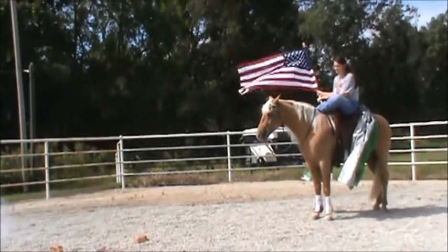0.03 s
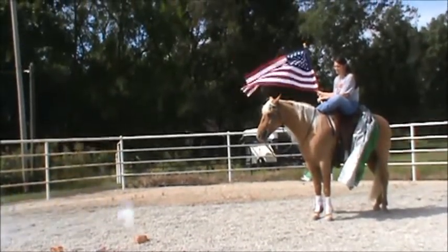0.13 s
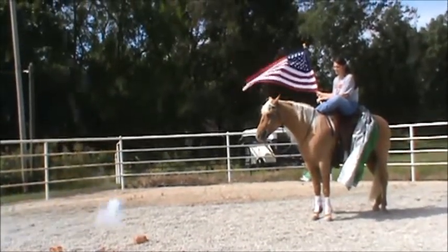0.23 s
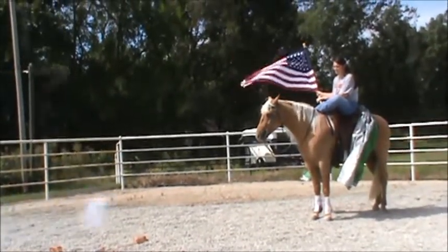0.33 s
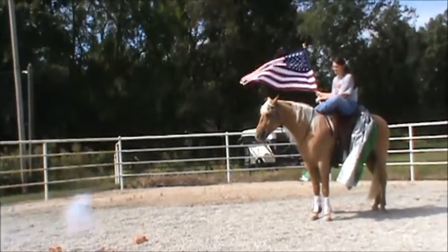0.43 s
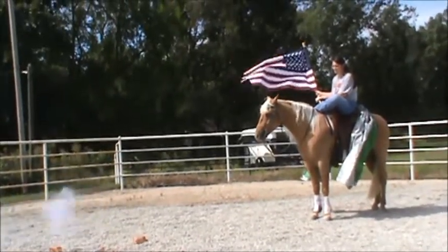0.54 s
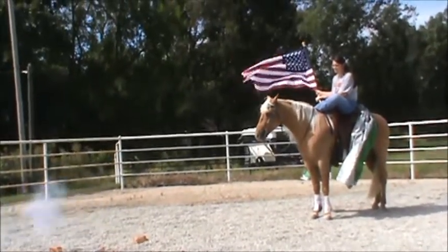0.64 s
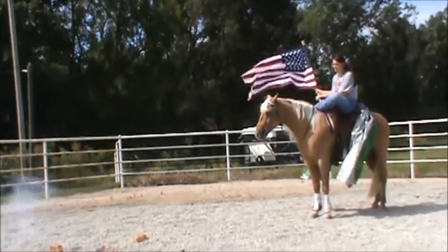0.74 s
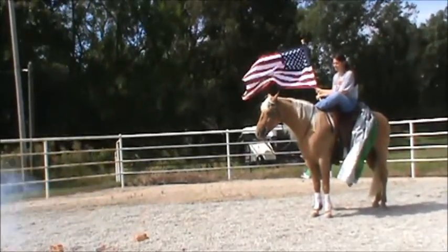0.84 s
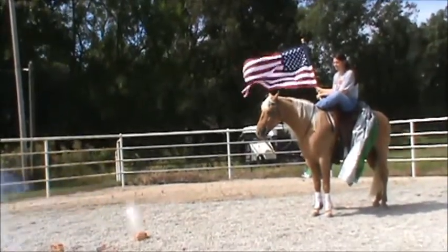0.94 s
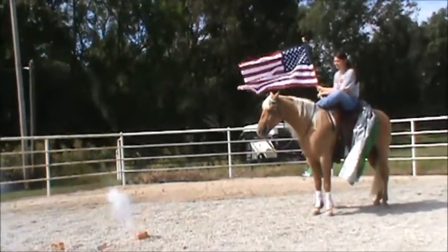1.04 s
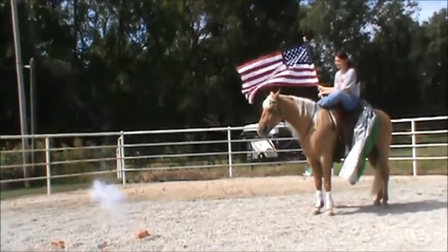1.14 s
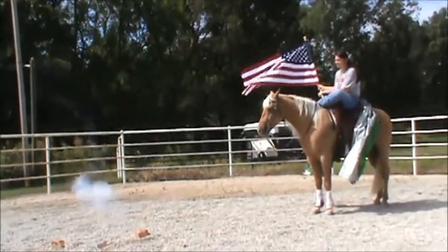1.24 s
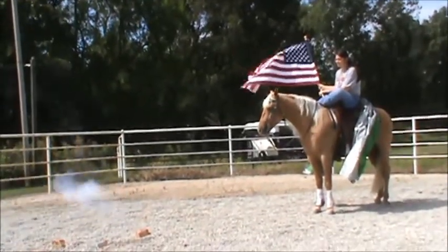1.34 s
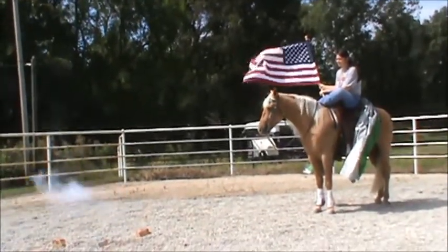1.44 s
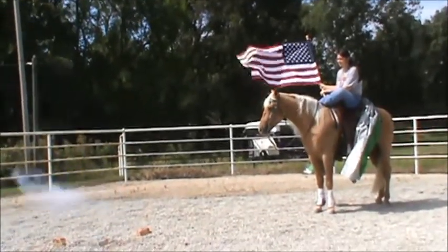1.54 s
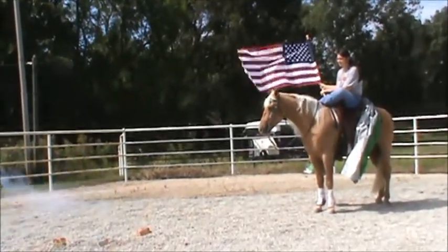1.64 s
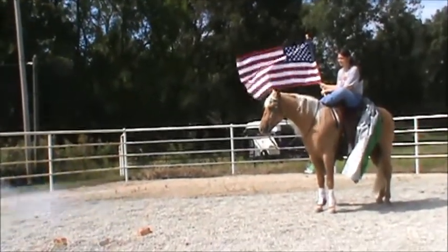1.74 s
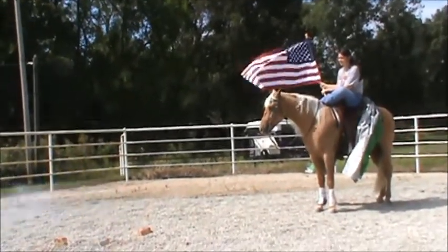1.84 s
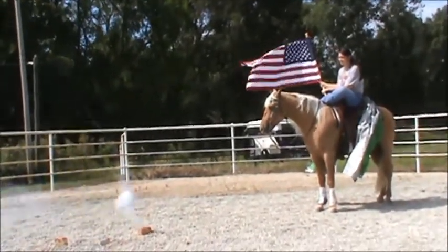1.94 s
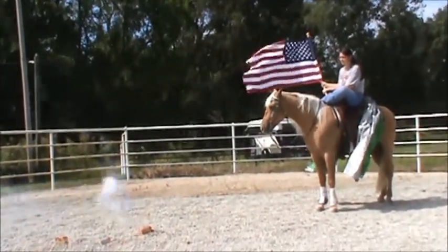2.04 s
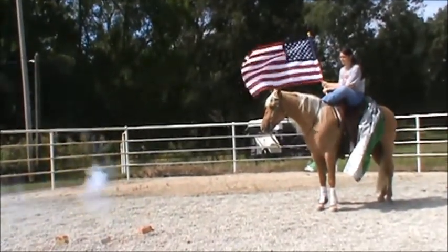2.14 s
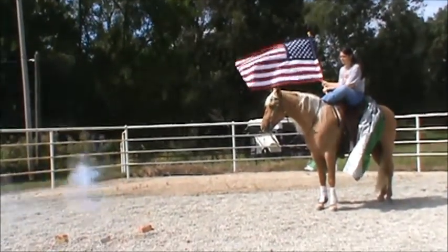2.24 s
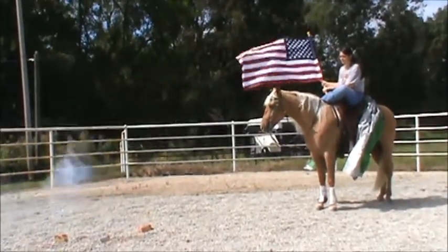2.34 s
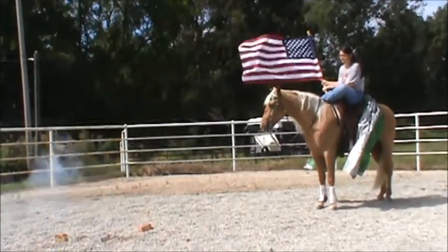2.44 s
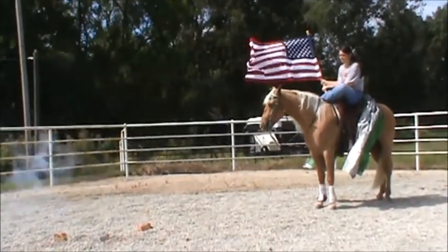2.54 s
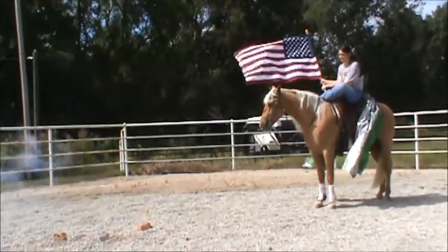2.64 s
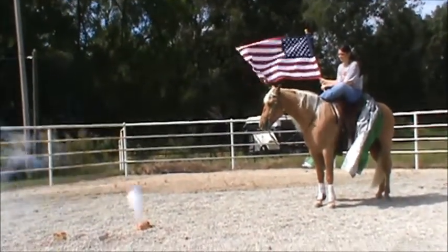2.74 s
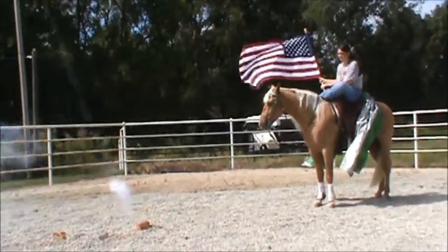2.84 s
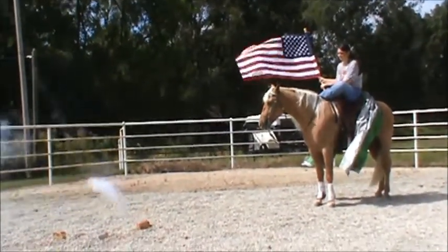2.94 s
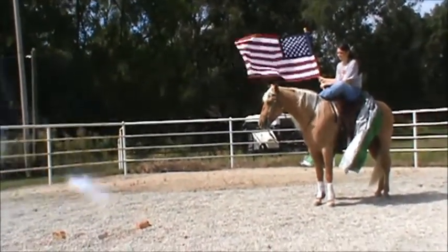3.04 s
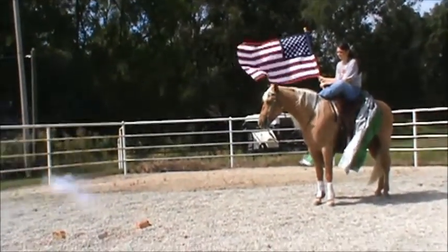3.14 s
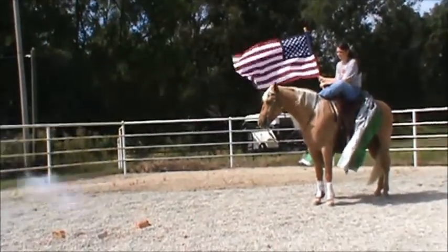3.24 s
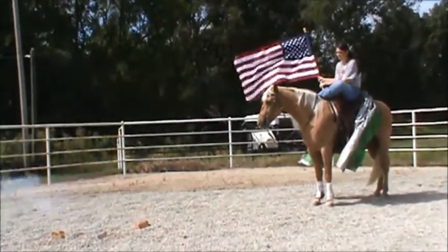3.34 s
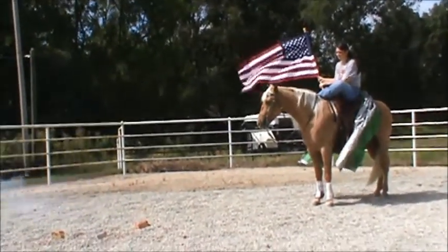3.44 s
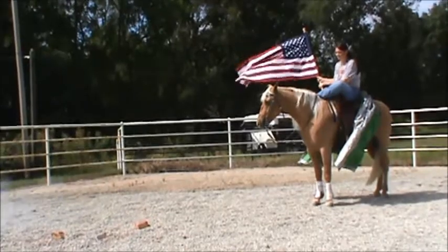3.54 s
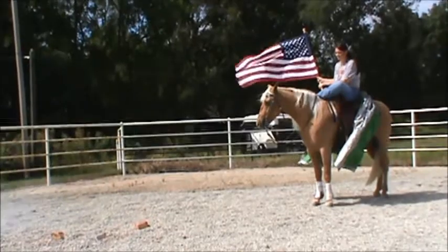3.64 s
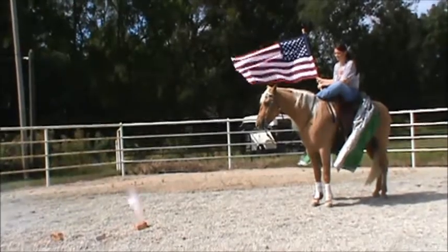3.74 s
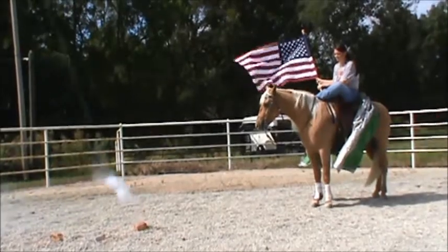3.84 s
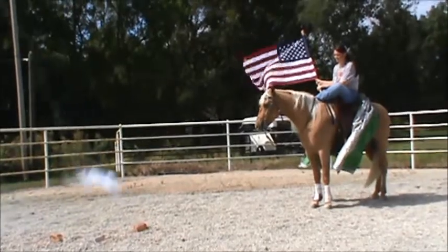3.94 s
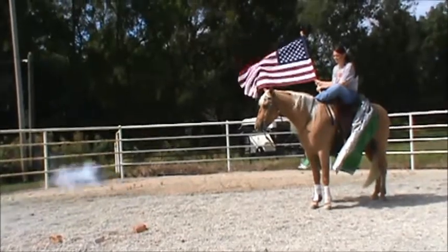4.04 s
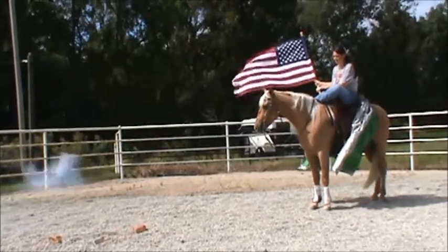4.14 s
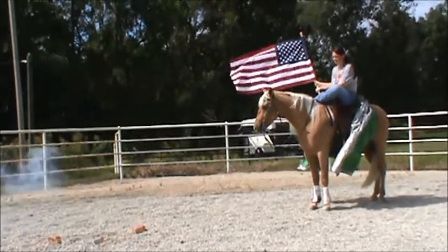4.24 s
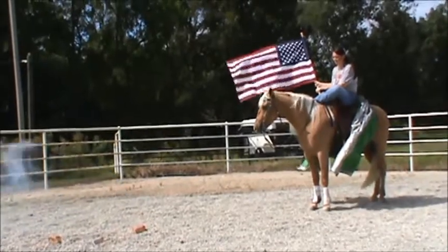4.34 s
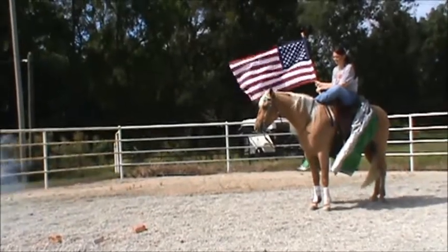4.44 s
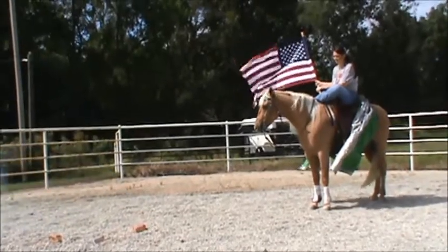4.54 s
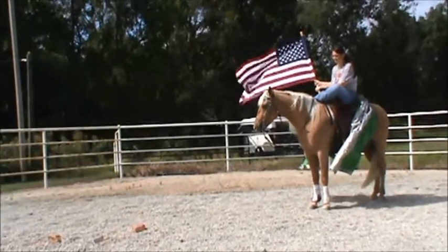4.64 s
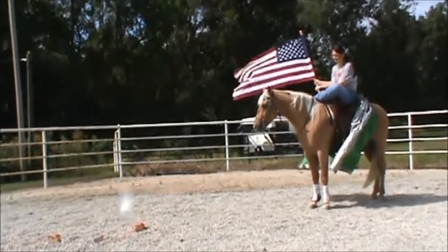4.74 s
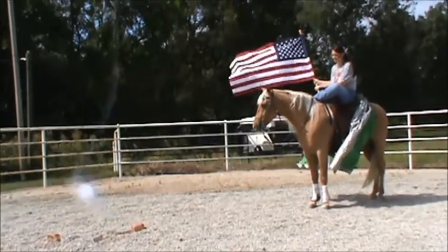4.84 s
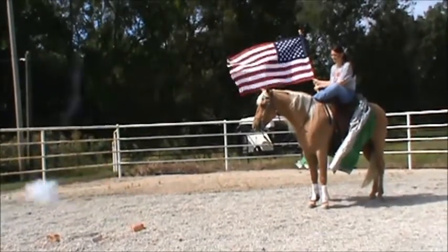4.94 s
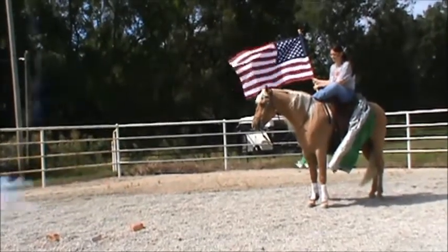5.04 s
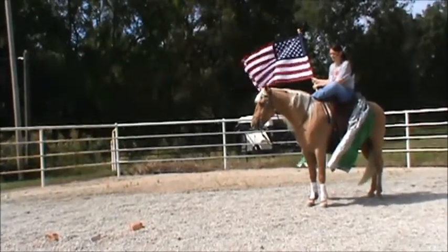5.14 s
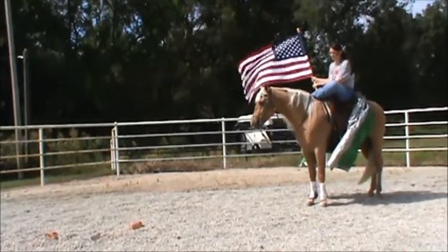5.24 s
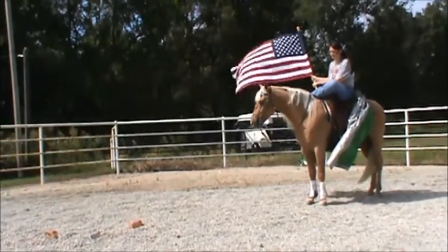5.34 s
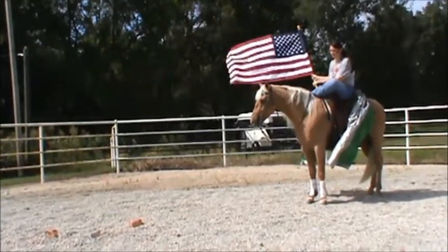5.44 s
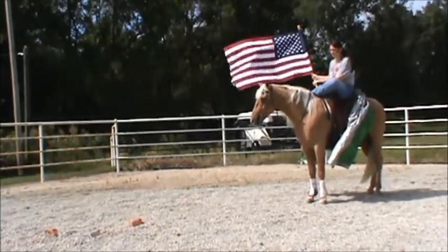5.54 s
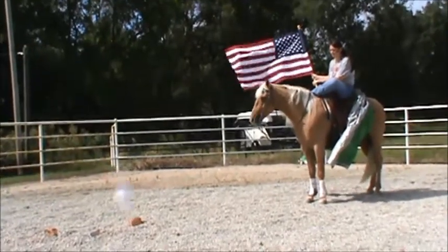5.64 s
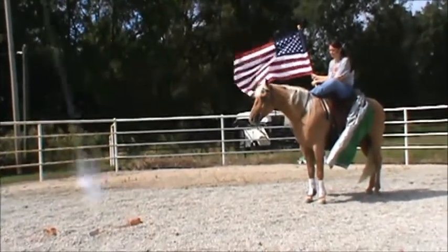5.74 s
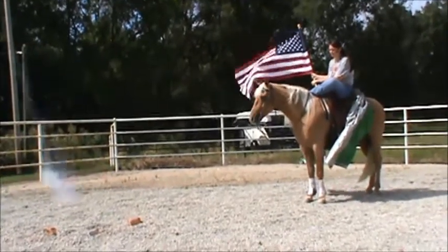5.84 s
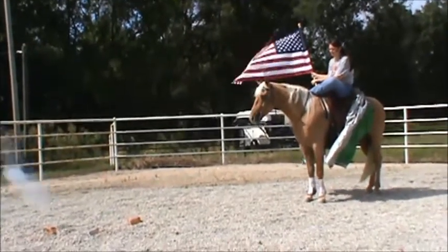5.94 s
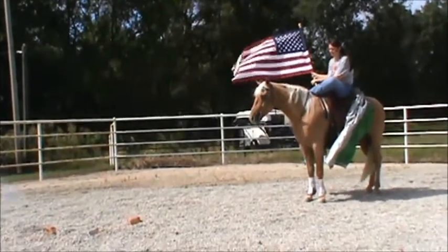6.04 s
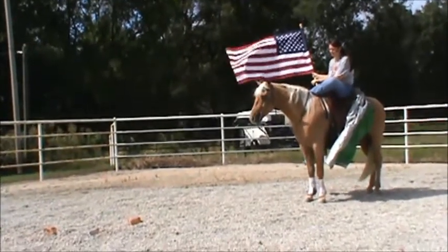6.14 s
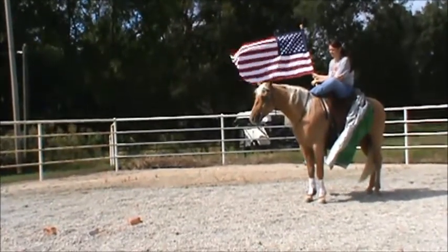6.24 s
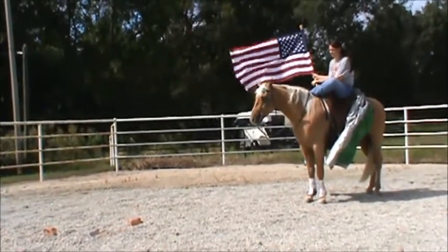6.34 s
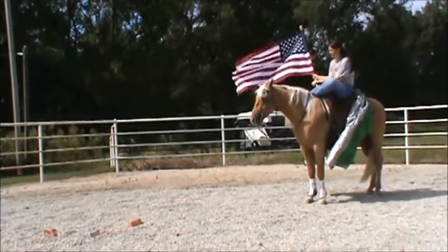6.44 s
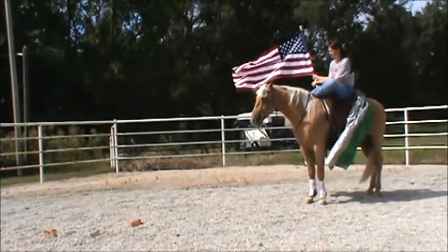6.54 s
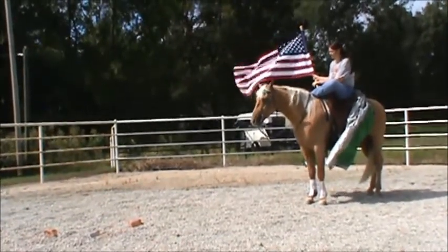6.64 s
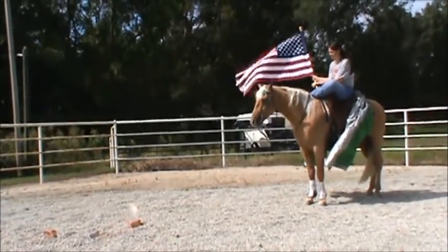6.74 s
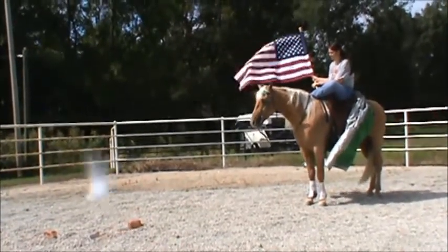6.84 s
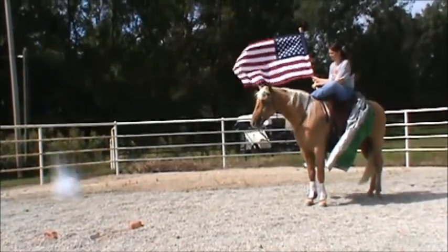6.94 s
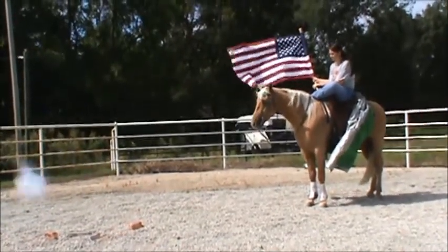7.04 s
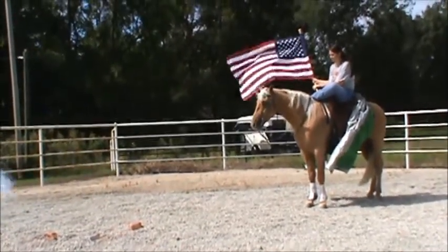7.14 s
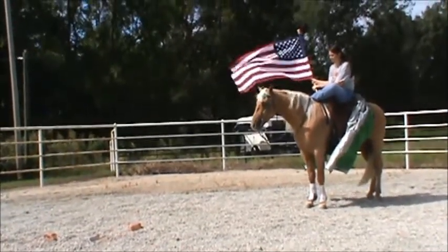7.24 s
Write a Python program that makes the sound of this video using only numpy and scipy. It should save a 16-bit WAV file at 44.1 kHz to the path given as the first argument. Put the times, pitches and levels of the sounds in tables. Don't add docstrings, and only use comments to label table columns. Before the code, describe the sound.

Outdoors in a sandy arena, leaves rustle faintly and wind makes low, lumpy buffets on a stereo microphone. At about 0.2 s a small rocket pops and almost instantly bangs, while its shrill whistle runs to 0.6 s. More launches pop at about 1.0, 2.0, 2.8, 3.8, 4.8 and 5.7 s. Each whistle lasts around 0.4 s, starting near 3.1 kHz, bright, buzzy and fluttering, sliding to about 2.4 to 2.6 kHz, then usually lifting as it fades, with hissing exhaust strongest at launch. Sharp bangs crack at 1.3, 2.2, 3.15, 4.0, 5.0 and 5.9 s, each with a quick ground slap and a bright, swelling tail from fence and trees. The sound ducks momentarily at each bang. At 6.83 s a final pop is followed at once by a bang at 6.87 s, without a whistle, then scattered ticking echoes until about 7.3 s.

```python
import sys
import numpy as np
from scipy import signal
from scipy.io import wavfile
from scipy.ndimage import uniform_filter1d, minimum_filter1d

SR = 44100
rng = np.random.default_rng(int(sys.argv[2]) if len(sys.argv) > 2 else 0)


def to_wav(s):
    ch = np.atleast_2d(s).T
    pcm = np.round(np.clip(ch, -1, 1) * 32767)
    wavfile.write(sys.argv[1], SR, pcm.astype(np.int16))


def gain_from_db(level_db):
    decades = np.asarray(level_db, float) / 20
    return 10 ** decades


N = 321930

# (frequency [Hz], level [dB])
LEAF_COLOUR = [(240, -50), (400, -35), (563, -17.5), (1870, -9), (2470, -16.5), (2890, -15.5),
               (3320, -20.5), (6190, -24), (10800, -13), (15000, -26.5), (15700, -33), (16500, -54)]
LEAF_DB = -38.5
# (time [s], level [dB])
LEAF_LEVEL = [(0, -4), (.9, -6.5), (1.9, -8), (2.75, -10), (3.75, -10.5), (4.75, -9), (5.65, -9.5),
              (6.75, -11), (7.3, -9)]
# (frequency [Hz], level [dB])
WIND_COLOUR = [(12, -51), (20, -37), (64, 1), (135, 3.5), (281, -4), (375, -13), (468, -19), (644, -27.5),
               (900, -29.5), (1170, -37), (1980, -120)]
# (frequency [Hz], likeness [0-1])
WIND_LIKENESS = [(30, .97), (70, .92), (140, .85), (280, .7), (900, .5)]
# (frequency [Hz], left leads by [radians])
WIND_LEAD = [(20, .25), (60, .5), (125, .95), (250, 1.4), (600, .5)]
# (time [s], level [dB])
BREEZE = [(0.0, -36), (0.34, -42.5), (1.04, -33.5), (1.28, -40), (1.83, -32), (2.18, -31), (2.6, -25),
          (2.86, -32.5), (4.02, -39.5), (5.31, -37), (5.57, -32.5), (6.28, -41), (6.73, -29.5),
          (7.3, -36.5)]
# (start [s], length [s], rumble [dB], flap over rumble [dB])
GUSTS = [(0, 0.012, -32, 2.5), (0.06, 0.042, -37.5, 7), (0.126, 0.093, -36, 6), (0.318, 0.07, -52, 11),
         (0.799, 0.046, -32.5, -14), (0.864, 0.019, -32, -21), (1.387, 0.12, -38.5, 1),
         (1.622, 0.11, -36, 4), (1.78, 0.032, -27.5, 1.5), (1.85, 0.021, -35.5, 7), (1.895, 0.12, -39.5, 7),
         (2.12, 0.034, -46.5, 5), (2.345, 0.1, -40, 5.5), (2.541, 0.072, -36, 5.5),
         (2.671, 0.011, -29.5, 2.5), (2.71, 0.15, -45, 1), (3.317, 0.19, -47, -29),
         (3.625, 0.053, -39, 9.5), (4.24, 0.17, -50.5, 2.5), (5.237, 0.032, -45, -15),
         (5.53, 0.025, -32, -9.5), (5.6, 0.16, -40, 6), (6.055, 0.053, -43, 6), (6.246, 0.08, -41.5, 4.5),
         (6.359, 0.06, -34, -5), (6.525, 0.048, -39.5, 2), (6.68, 0.16, -33.5, -1.5),
         (6.858, 0.049, -53, 12), (7.067, 0.056, -34, -3), (7.24, 0.048, -30.5, -12)]
GUST_RISE_S, GUST_FALL_S, CALM_RUMBLE_DB, CALM_FLAP_DB = 0.0033, 0.012, -8.5, -8
# (time [s], peak [dB], pitch [Hz], left over right [dB])
SLAPS = [(0.067, -24, 250, 2), (1.84, -39, 266, 2.0), (1.85, -30, 378, 1.0), (2.539, -25, 250, 6),
         (2.676, -24, 304, -6), (3.669, -26, 312, 6), (6.685, -32, 256, 3.0), (6.802, -43, 288, -4)]

# (frequency [Hz], time [s])
TREE_DECAY = [(300, 0.043), (1000, 1.234), (3000, 1.05), (7000, 0.73), (14000, 0.36)]
# (delay [s], from high up [dB], from near the ground [dB])
TREE_ANSWER = [(0, 4, -10.5), (.04, -0.5, -16), (.07, -0.5, -18.5), (.083, 2, -22), (.11, 2, -9),
               (.16, 5, -8.5), (.3, 4.5, -5.5)]
# (frequency [Hz], level [dB])
TREE_BANG_COLOUR = [(180, -45), (300, -10), (343, -20), (1870, -15.5), (2980, -25.5), (4370, -19),
                    (5610, -27), (6850, -22), (11700, -23.5), (16000, -37)]
# (frequency [Hz], level [dB])
TREE_WHISTLE_COLOUR = [(1500, -25), (2550, -9.5), (2800, 1), (3000, -5), (3500, -18), (5000, -4), (9000, 4),
                       (16000, -29.5)]
# (time [s], peak [dB], left over right [dB])
TICKS = [(.783, -31, -1), (3.177, -11, -4), (5.706, -21.5, 2), (5.711, -18.5, -3), (6.013, -24, 8),
         (6.181, -25, 12), (6.843, -14, 2), (6.847, -20, -8), (6.906, -16, 14), (6.92, -16, -12),
         (6.925, -18, 0), (6.95, -16.5, 10), (6.959, -19, 9), (6.982, -19, 13), (6.987, -24, 7),
         (7.018, -20, 4), (7.108, -33, 3)]

# (time [s], peak [dB], ground echo delay [s], ground echo [dB])
BANGS = [
    (.2183, 12, .0058, -9),
    (1.3356, 14, .0056, -8),
    (2.1828, 12, .0054, -10),
    (3.15, 14, .0046, -8),
    (4.0093, 12, .0053, -9),
    (5.021, 12, .0057, -11),
    (5.9216, 14, .0058, -10),
    (6.8662, 12, .006, -10),
]
# (tree tail [dB], left over right [dB], close echoes of the fence [dB])
BANG_ECHOES = [(8, 2, -3), (8, 3.5, -10.5), (8, 6.5, -8), (8, 6.5, -8), (8, 7, -10), (8, 3.5, -12),
               (8, -7.5, -6), (11, 2.5, -10)]
# (time [s], thump of the tube [dB])
THUMPS = [(.1842, -9.5), (1.004, -7), (1.9618, -14), (2.7879, -13), (3.8149, -13), (4.8062, -12),
          (5.6962, -12), (6.8308, -14)]
# (crack [dB], fizz before it [dB])
POP_GAS = [(-1, -15), (-4, -10), (-4.5, -23), (-3, -28), (2.5, -13), (-2, -15.5), (-11, -16), (-7, -18)]
SWING_HZ, SWING_S = 330, .0044

# (time [s], pitch [Hz])
PITCH = [
    [(0.201, 3084), (0.251, 3067), (0.307, 2947), (0.325, 2915), (0.479, 2468), (0.563, 2557),
     (0.591, 2720), (0.6, 2760)],
    [(1.021, 3236), (1.029, 3094), (1.085, 3030), (1.197, 2722), (1.343, 2427), (1.413, 2466),
     (1.439, 2780), (1.445, 2800)],
    [(1.979, 3166), (2.017, 3106), (2.091, 2876), (2.18, 2605), (2.231, 2474), (2.295, 2385), (2.333, 2638),
     (2.35, 2870)],
    [(2.806, 3080), (2.824, 3180), (2.876, 3077), (2.97, 2740), (3.07, 2505), (3.15, 2446), (3.195, 2440),
     (3.22, 2680)],
    [(3.829, 3130), (3.837, 3000), (3.875, 3103), (3.97, 2773), (4.089, 2413), (4.147, 2410), (4.211, 2350),
     (4.255, 2740)],
    [(4.826, 3110), (4.875, 3097), (4.93, 2946), (4.99, 2830), (5.05, 2700), (5.112, 2627), (5.15, 2555),
     (5.205, 2750)],
    [(5.724, 3650), (5.732, 3340), (5.8, 3055), (5.934, 2680), (5.984, 2584), (6.054, 2654), (6.074, 2880),
     (6.085, 2970)],
]
# (time [s], level [dB])
BURN = [
    [(0.201, -13), (0.229, -21.5), (0.251, -11.5), (0.451, -13), (0.495, -11), (0.525, -22.5), (0.539, -13),
     (0.61, -25)],
    [(1.021, -15.5), (1.147, -13.5), (1.157, -12.5), (1.299, -12.5), (1.347, -34), (1.369, -18.5),
     (1.429, -22), (1.45, -32)],
    [(1.976, -17), (2.159, -16.5), (2.191, -24), (2.207, -15.5), (2.291, -14), (2.299, -22), (2.36, -30)],
    [(2.805, -18), (2.904, -15), (2.996, -17.5), (3.016, -13.5), (3.134, -15.5), (3.162, -27.5),
     (3.21, -24), (3.25, -27)],
    [(3.829, -18), (4.037, -14), (4.043, -23.5), (4.105, -15), (4.135, -26.5), (4.185, -26), (4.211, -16.5),
     (4.27, -35.5)],
    [(4.826, -15), (4.868, -13.5), (4.988, -14.5), (5.026, -19.5), (5.062, -17), (5.082, -44),
     (5.098, -15.5), (5.22, -34)],
    [(5.724, -23.5), (5.73, -14.5), (5.908, -14.5), (5.922, -19), (5.94, -17.5), (5.958, -29.5),
     (5.992, -16), (6.12, -34)],
]
# (beats against ground echo [per s], echo share [0-1],
# fourth partial over third [dB], fifth over third [dB], first flare [share of pitch])
NOTES = [(57.1, 0.39, -8, -22, 0.08), (46.2, 0.4, -7.5, -22, 0.0025), (51.6, 0.42, -5.5, -24, 0.02),
         (48.3, 0.37, -6.5, -21, 0.126), (56.9, 0.44, -3.5, -20, 0.043), (35, 0.33, -7.5, -19, 0.163),
         (28, 0.29, -6, -20, 0.038)]
# (exhaust hiss [dB], upper partials [dB], hiss ends before note [s])
JETS = [(3.5, 2, 0.059), (6.5, 4.5, 0.12), (0.5, 1.5, 0.033), (3.5, 2, 0.091), (4.5, 3, 0.069),
        (3.5, 2, 0.094), (1.5, 1, 0.066)]
# (frequency [Hz], level [dB])
HISS_COLOUR = [(500, -31), (1500, -14), (2700, 8), (3300, 3), (3700, -2), (4400, 1), (6000, 1), (8500, 9),
               (11000, 9.5), (13500, -4.5), (15800, -4), (16200, -86)]
# (frequency [Hz], level [dB])
MOUTH = [(2400, -2.5), (3300, 2.5), (4800, -6), (5300, -6.5), (6200, -13.5), (7400, -13), (8300, -7.5),
         (9400, -9)]
# (frequency [Hz], left over right [dB])
PORTS = [(2400, 7.5), (2700, 4), (2900, 6), (3100, 0.5), (3400, 6)]
# (frequency [Hz], level [dB])
HIGH = [(9400, 0), (10500, 1), (12000, 0), (13500, -5), (15800, -16)]
CATCH_DB, CATCH_S = -7.5, 0.022
DYING_DB, DYING_S = -10, 0.051
SECOND_DIES = 2.2
UPPER_FOLLOWS = 0.24
BEAT_FADE_S = 0.61
LIGHT_DB, LIGHT_S = 3.5, 0.00076
JET_DB, JET_FADE_DB_PER_S, JET_FOLLOWS = -27.5, -3.5, 0.24
BLAST_DB, BLAST_S = 12, 0.015
JET_END_DB, JET_END_S = -9.5, .04


def evened(x):
    return x / np.sqrt(np.mean(x ** 2) + 1e-20)


def read(points, hz):
    f, value = np.transpose(points)
    return np.interp(np.log(hz + 1), np.log(f + 1), value)


def over_time(points, t):
    return np.interp(t, *np.transpose(points))


def add(mix, s, sound, pan_db):
    part = mix[:, round(s * SR):][:, :sound.shape[-1]]
    side = gain_from_db(np.array([[.5], [-.5]]) * pan_db)
    part += (sound * side)[:, :part.shape[1]]


def drift(count, per_s):
    size = max(round(SR / per_s), 1)
    once = uniform_filter1d(rng.standard_normal(count), size)
    return evened(uniform_filter1d(once, size))


def soft(x, hz):
    return signal.lfilter(*signal.butter(2, hz, fs=SR), x)


def noise(spectrum, likeness, lead=((0, 0), (1, 0)), patchy_db=0., size=1024):
    frames, hz = 4 * N // size + 5, np.fft.rfftfreq(size, 1 / SR)
    a, b, c, d, patches = rng.standard_normal((frames, len(hz), 5)).T
    patches = evened(uniform_filter1d(uniform_filter1d(patches, 6, 0), 8, 1))
    same = read(likeness, hz)[:, None]
    left = a + 1j * b
    right = same * left + np.sqrt(1 - same ** 2) * (c + 1j * d)
    right = right * np.exp(-1j * read(lead, hz))[:, None]
    level_db = read(spectrum, hz)[:, None] + patchy_db * patches
    z = np.array([left, right]) * gain_from_db(level_db)
    return evened(signal.istft(z, nperseg=size, noverlap=3 * size // 4)[1][:, :N])


def rustling_leaves():
    level_db = LEAF_DB + over_time(LEAF_LEVEL, np.arange(N) / SR)
    return gain_from_db(level_db) * noise(LEAF_COLOUR, [(0, .75)], patchy_db=.6)


def wind():
    t, now = np.arange(0, N / SR + .01, .005), np.arange(N) / SR
    s, length, db, over_db = np.transpose(GUSTS)[..., None]
    rise = np.minimum(t - s, 0) / GUST_RISE_S
    fall = np.maximum(t - s - length, 0) / GUST_FALL_S
    shape = np.exp(rise - fall)
    calm_db = over_time(BREEZE, t)
    rumble_gain = gain_from_db(calm_db + CALM_RUMBLE_DB) + (gain_from_db(db) * shape).max(0)
    flap_gain = gain_from_db(calm_db + CALM_FLAP_DB) + (gain_from_db(db + over_db) * shape).max(0)
    rumble_gain, flap_gain = np.interp(now, t, rumble_gain), np.interp(now, t, flap_gain)
    body = noise(WIND_COLOUR, WIND_LIKENESS, lead=WIND_LEAD, size=2048)
    rumble = signal.sosfiltfilt(signal.butter(2, 140, fs=SR, output="sos"), body)
    lumps = np.clip(drift(N, per_s=70), -3, 1.8)
    flap = evened((body - rumble) * gain_from_db(3.6 * lumps))
    rumble = evened(rumble * gain_from_db(2. * lumps))
    upper = signal.sosfilt(signal.butter(2, 320, "high", fs=SR, output="sos"), flap)
    flap = flap + upper * (flap_gain / gain_from_db(-23.5)) ** 0.42
    return rumble * rumble_gain + flap * flap_gain


def slap(hz):
    t = np.arange(900) / SR
    puff = soft(rng.standard_normal(900), 1100)
    return (np.sin(2 * np.pi * hz * t) + 1.2 * puff) * np.exp(-t / .003)


def trees(x, colour, axis):
    taps = np.zeros((3, 2 * SR))
    at = np.arange(300, 2 * SR - 8, 8) + rng.integers(0, 8, (3, (2 * SR - 301) // 8))
    np.put_along_axis(taps, at, rng.choice([-1., 1.], at.shape), 1)
    taps = taps[:2] + 1.76 * taps[2]
    taps = taps * gain_from_db(2.0 * drift(2 * SR, per_s=510))
    hz, t, z = signal.stft(taps, SR, nperseg=256)
    answer_db = np.interp(t, *np.transpose(TREE_ANSWER)[[0, axis]])
    level_db = answer_db - 60 * t / read(TREE_DECAY, hz)[:, None]
    tail = signal.istft(z * gain_from_db(read(colour, hz)[:, None] + level_db), SR, nperseg=256)[1]
    return signal.fftconvolve(x[None], tail / np.linalg.norm(tail[0]), axes=1)[:, :N]


def shock(ring_hz=900, ring_s=0.00027):
    t = np.arange(500) / SR
    front = -np.exp(-t / .00008)
    return front + 1.47 * np.sin(2 * np.pi * ring_hz * t) * np.exp(-t / ring_s)


def far_tick(db):
    scatter = rng.standard_normal(300) * np.exp(-np.arange(300) / 380.0)
    return gain_from_db(db - 15.5) * np.convolve(scatter, soft(shock(ring_hz=1220, ring_s=0.0003), 3600))


def add_bang(mix, bang, echoes):
    (s, db, delay_s, echo_db), (_, pan_db, close_db) = bang, echoes
    add(mix, s, gain_from_db(db) * soft(shock(), 9300), pan_db)
    for close_s in (.0012, .0027):
        close = soft(shock(ring_hz=1350, ring_s=0.00021), 4300)
        add(mix, s + close_s, gain_from_db(db + close_db) * close, -pan_db)
    ground = soft(shock(ring_hz=1320, ring_s=0.00032), 2000)
    add(mix, s + delay_s, gain_from_db(db + echo_db) * ground, pan_db)


def pop(thump_db, crack_db, fizz_db):
    t = np.arange(1200) / SR - .006
    after = np.maximum(t, 0)
    gas = rng.standard_normal((3, len(t)))
    gas = gas[2] + 0.21 * gas[:2]
    gas = signal.lfilter(*signal.butter(1, [5000, 11000], "band", fs=SR), gas)
    fizz = gain_from_db(fizz_db) * np.exp(np.minimum(t, 0) / .0016 - after / .0035)
    front = np.sin(2 * np.pi * 3900 * after - 1.5) * np.exp(-after / .00017)
    crack = gain_from_db(crack_db) * (t >= 0) * (1.4 * front + gas * np.exp(-after / .0005))
    low = np.sin(2 * np.pi * SWING_HZ * after + 1.3) * (.12 + np.exp(-(after / SWING_S) ** 2))
    low = low * np.exp(-after / .012) * (1 - np.exp(-after / .0004))
    knock = .55 * np.sin(2 * np.pi * 880 * after - .9)
    knock = knock * np.exp(-after / .0028) * (1 - np.exp(-after / .0003))
    return soft(gas * fizz + crack, 19000) + gain_from_db(thump_db) * (t >= 0) * (low + knock)


def exhaust_hiss(t, age, burn_db, jet_db, early_s, exhaust):
    top_db = burn_db.max()
    level_db = top_db + JET_FOLLOWS * (burn_db - top_db) + JET_DB + jet_db + JET_FADE_DB_PER_S * age
    level_db = level_db + BLAST_DB * np.exp(-age / BLAST_S)
    level_db = level_db + JET_END_DB * (1 + np.tanh((t - t[-1] + early_s) / JET_END_S))
    level_db = level_db + 15 + 1.3 * drift(len(t), per_s=200)
    hiss = gain_from_db(level_db) * exhaust[:, round(t[0] * SR):][:, :len(t)]
    return hiss * (1 - .5 * np.exp(-age / 0.53))


def whistle(pitch, burn, note, jet, exhaust):
    t = np.arange(burn[0][0] - .004, burn[-1][0], 1 / SR)
    age = t - t[0]
    per_s, share, fourth_db, fifth_db, flare = note
    jet_db, upper_db, early_s = jet
    burn_db = over_time(burn, t)
    top_db = burn_db.max()
    hz = uniform_filter1d(over_time(pitch, t), size=400)

    dying_db = DYING_DB * np.exp((t - t[-1]) / DYING_S)
    first_db = burn_db + read(MOUTH, hz) + LIGHT_DB * np.exp(-(age / LIGHT_S - 1) ** 2)
    upper_db = upper_db + top_db + UPPER_FOLLOWS * (burn_db - top_db) - 23.4 * age
    catch_db = CATCH_DB * np.exp(-age / CATCH_S)
    second_db = upper_db + read(MOUTH, 2 * hz) + catch_db + SECOND_DIES * dying_db
    third_db = upper_db + read(MOUTH, 3 * hz) + dying_db
    sides = np.array([[.5], [-.5]]) * read(PORTS, hz)

    unsteady = .006 * drift(len(t), per_s=600) + (.006 + .004 * age) * drift(len(t), per_s=80)
    hz = hz * (1 + flare * np.exp(-(age / .002) ** 2) + unsteady)
    fourth_db = upper_db + fourth_db - 6.5 + read(HIGH, 4 * hz) + 2.0 * age + 2 * dying_db
    fifth_db = upper_db + fifth_db + 5.0 + read(HIGH, 5 * hz) + 2 * dying_db
    turns = np.cumsum(hz) / SR
    beat_hz = per_s * (1 + 0.144 * drift(len(t), per_s=9.9))
    lag = np.cumsum(beat_hz) / SR + np.array([[0], [.15]])
    echo_gain = np.clip(share, 0, 1) * np.exp(-age / BEAT_FADE_S)
    tone = 0
    for k, db in enumerate([first_db, second_db, third_db, fourth_db, fifth_db], 1):
        direct = np.cos(2 * np.pi * k * turns - k)
        echo = echo_gain * np.cos(2 * np.pi * k * (turns - lag))
        flicker_db = (1.2 + .8 * k) * drift(len(t), per_s=150) - .12 * k ** 2
        level_db = db + flicker_db + sides / k ** 1.7
        tone = tone + np.sqrt(2) * gain_from_db(level_db) * (direct + echo) * (k * hz < 15900)
    hiss = exhaust_hiss(t, age, burn_db, jet_db, early_s, exhaust)
    edges = np.clip(age / .0012, 0, 1) * np.clip((t[-1] - t) / .03, 0, 1)
    return t[0], (tone + hiss) * edges


def scene():
    near, rockets, echoing, bangs = np.zeros((4, 2, N))
    exhaust = noise(HISS_COLOUR, [(0, 0.93)], patchy_db=1.5, size=256)
    for pitch, burn, note, jet in zip(PITCH, BURN, NOTES, JETS):
        s, sound = whistle(pitch, burn, note, jet, exhaust)
        add(rockets, s, sound, 0)
        climb_db = -30. * np.arange(sound.shape[1]) / SR
        add(echoing, s, sound * gain_from_db(climb_db), 0)
    for (s, thump_db), (crack_db, fizz_db) in zip(THUMPS, POP_GAS):
        add(near, s - .006, pop(thump_db, crack_db, fizz_db), 0)
        bangs[1, round(s * SR)] = gain_from_db(-9.5)
    for (launch_s, _), bang, echoes in zip(THUMPS, BANGS, BANG_ECHOES):
        add_bang(near, bang, echoes)
        s, tail_db = bang[0], echoes[0]
        still_low = int(s - launch_s < .1)
        bangs[still_low, round(s * SR)] = gain_from_db(tail_db)
    for s, db, pan_db in TICKS:
        add(near, s, far_tick(db), pan_db)
    for s, db, hz, pan_db in SLAPS:
        add(near, s, gain_from_db(db + 4.5) * slap(hz), pan_db)
    far = trees(bangs[0], TREE_BANG_COLOUR, axis=1) + trees(bangs[1], TREE_BANG_COLOUR, axis=2)
    far = far + gain_from_db(-15.0) * trees(echoing.mean(0), TREE_WHISTLE_COLOUR, axis=1)
    return near + rockets + far + wind() + rustling_leaves()


def top_cut(x):
    return signal.sosfilt(signal.butter(12, 16810, fs=SR, output="sos"), x)


def record(dry):
    peak_db = 20 * np.log10(abs(dry).max(0) + 1e-9)
    ahead = np.append(peak_db[110:], np.full(110, -99.))
    ahead = -minimum_filter1d(-ahead, 111, origin=55)
    fall = np.arange(N) * 1300. / SR
    held_db = np.maximum.accumulate(ahead + fall) - fall
    over_db = np.maximum(held_db + .7, 0)
    limited = dry / gain_from_db(uniform_filter1d(over_db, 12))
    lowpass = signal.firwin(255, 16100, window=("kaiser", 8), fs=SR)
    return top_cut(signal.oaconvolve(limited, lowpass[None], "same"))


dry = scene()
out = record(dry)
to_wav(out)
```